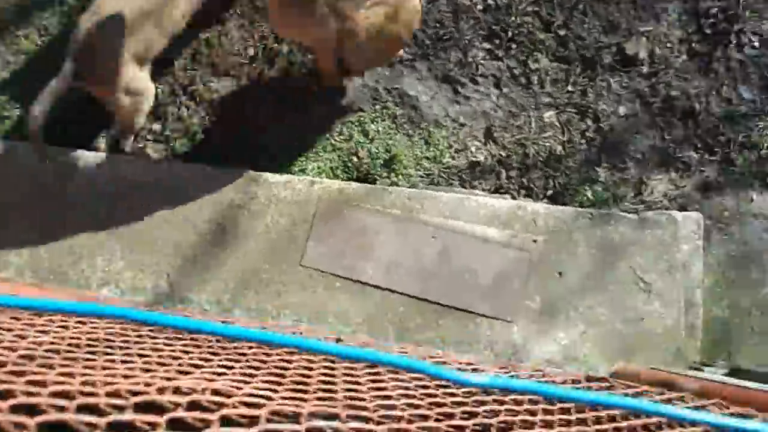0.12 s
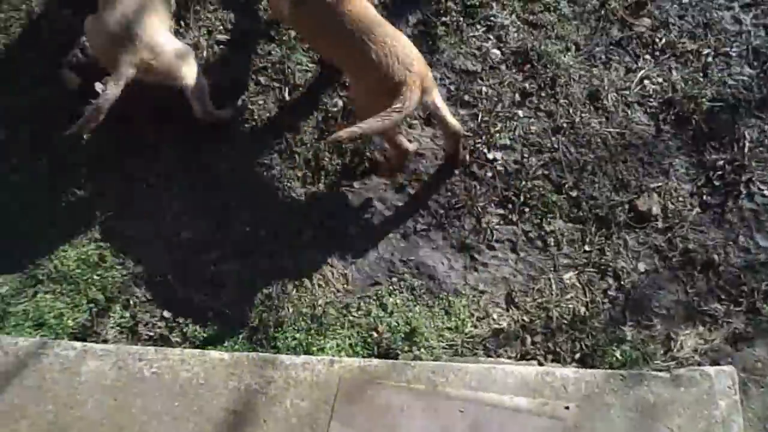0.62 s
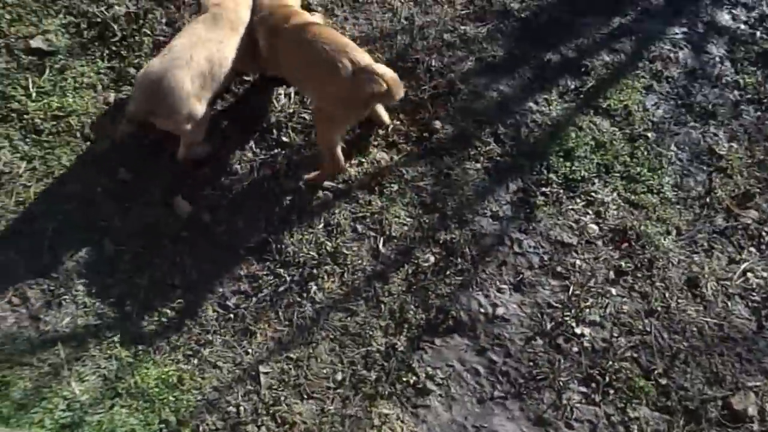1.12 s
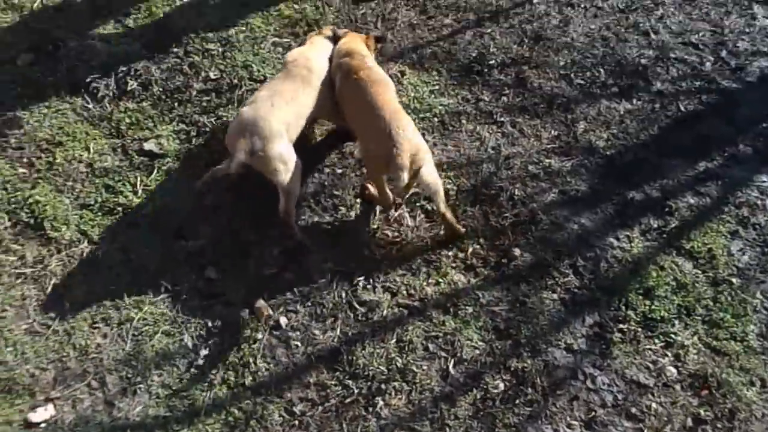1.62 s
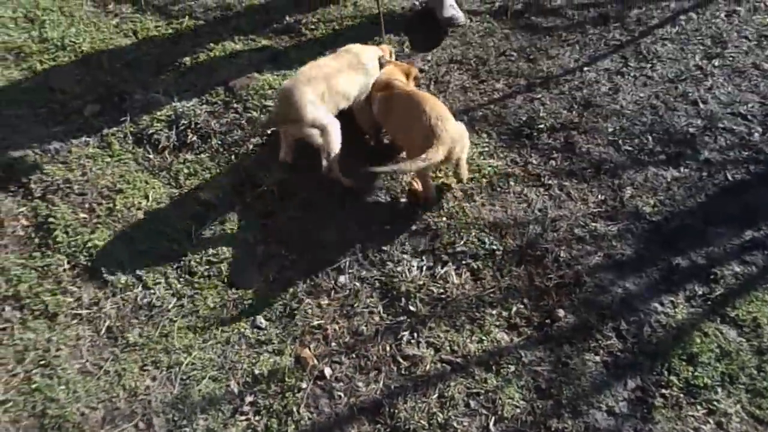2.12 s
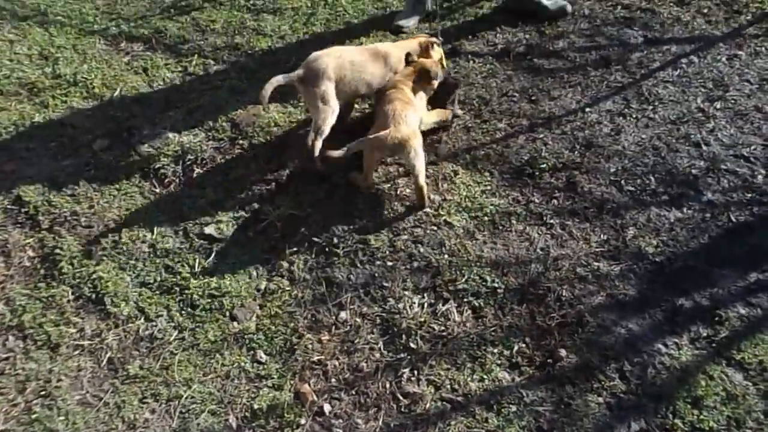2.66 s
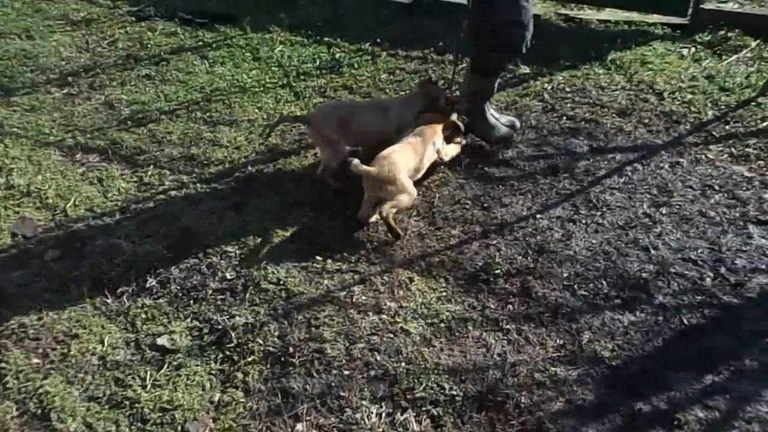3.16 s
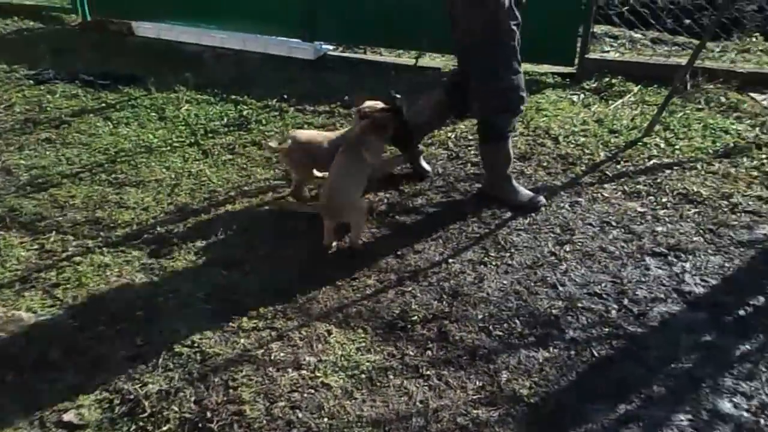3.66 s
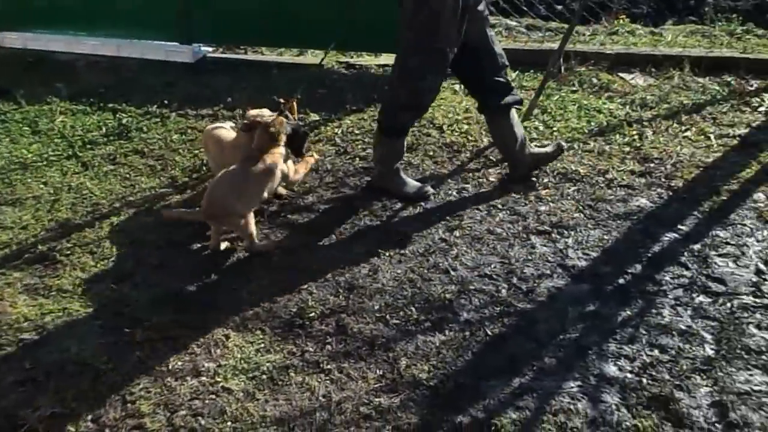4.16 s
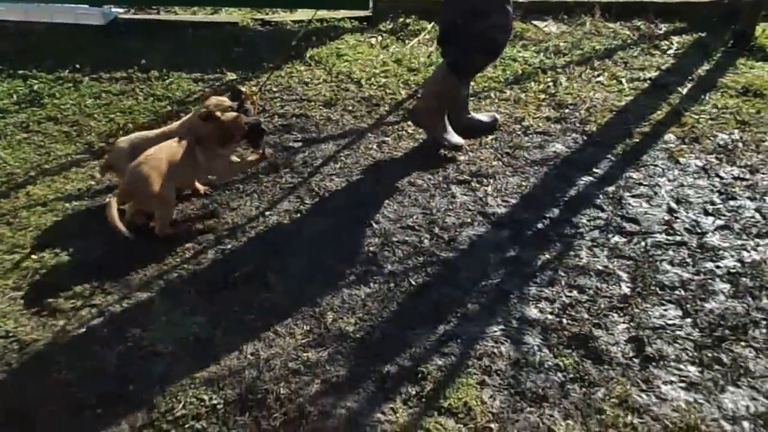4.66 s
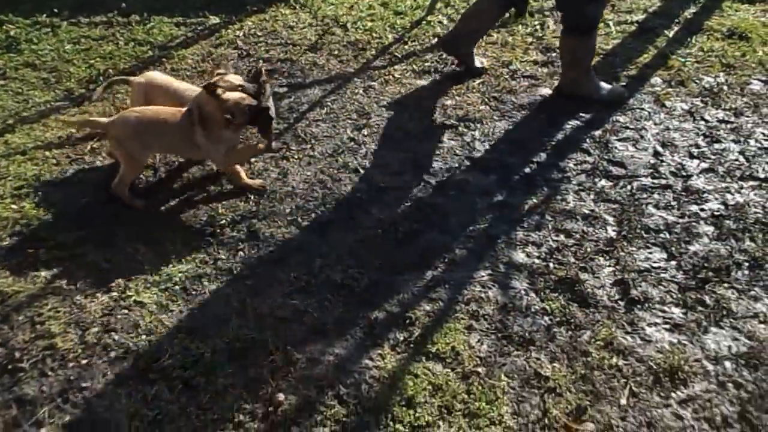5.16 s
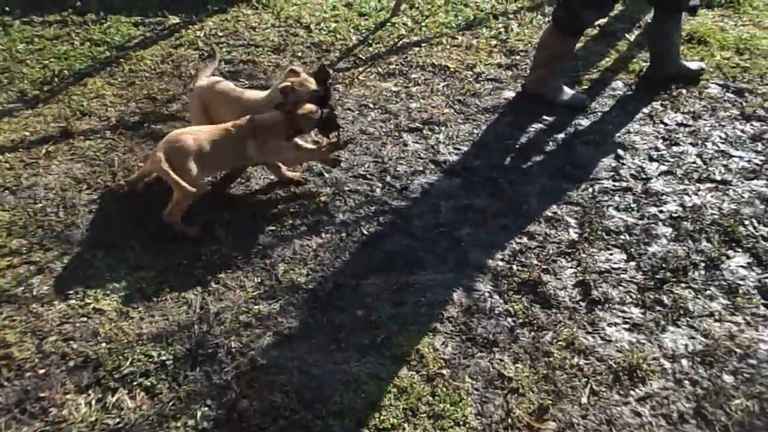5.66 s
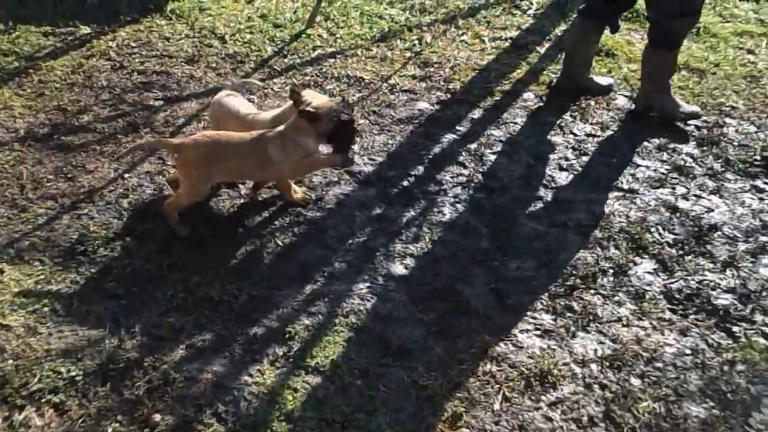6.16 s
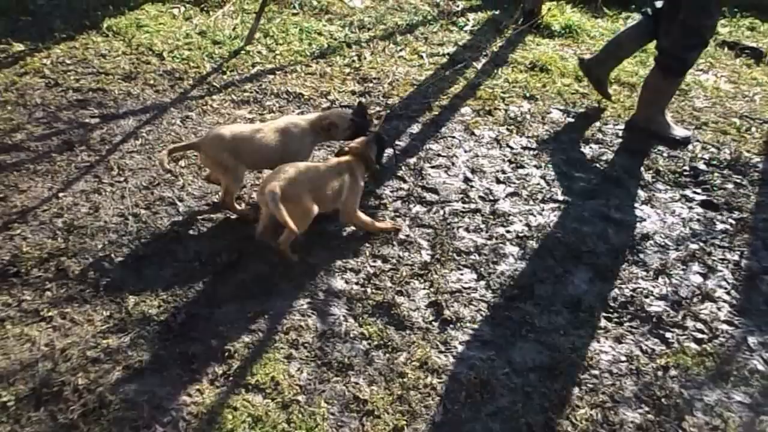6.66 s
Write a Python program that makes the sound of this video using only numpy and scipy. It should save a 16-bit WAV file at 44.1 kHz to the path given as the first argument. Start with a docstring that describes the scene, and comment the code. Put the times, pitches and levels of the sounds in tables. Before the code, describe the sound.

Close, dry scuffling on gritty mud: irregular soft thuds, crackling scrapes and short twig snaps, two of them sharp early on. Then one puppy yelps brightly, another whines thinly through the nose, and further yelps shrink into muffled cries. The voices echo briefly off yard walls, while faint air and microphone hiss runs underneath. A band-limited handheld microphone slightly overloads on the loudest peaks.

```python
"""Over a soft, wavering outdoor hiss, two puppies tug at a rag in a walled yard: from the start paws thud (low
pulses) and scuff on gritty mud (filtered random grains), and twigs and grit snap (short cracks). From 3.6 s
rising yelps ring off the yard walls, the first with a dull click at its peak; a second puppy whines thinly at
3.9 s and 5.2 s. Snaps and scuffs go on, with a last faint, low yelp at 6.5 s. Voices are harmonic stacks
through a vocal tract; the yard is one wall echo and a decaying noise tail."""
import sys
import numpy as np
from scipy import signal
from scipy.fft import rfft, irfft, next_fast_len
from scipy.io import wavfile

SR = 44100
rng = np.random.default_rng(int(sys.argv[2]) if len(sys.argv) > 2 else 0)


def natural_amplitude(level_db):
    """Convert a level in decibels to a linear amplitude factor, elementwise."""
    exponent = np.asarray(level_db, float) / 20
    return 10 ** exponent


def master(y):
    """Save y as 16-bit WAV."""
    cut = np.clip(np.atleast_2d(y).T, -1, 1)
    pcm = np.round(cut * 32767)  # scale
    wavfile.write(sys.argv[1], SR, pcm.astype(np.int16))


N = 299483  # samples


def rms_one(x):
    """Scale to rms 1."""
    return x / np.sqrt(np.mean(x ** 2) + 1e-20)


def at_hz(points, hz):
    """Read a spectrum in dB on a log-frequency axis."""
    points_hz, points_db = np.transpose(points)
    return np.interp(np.log(hz), np.log(points_hz), points_db)


def filtered(x, order, cut_hz, kind="low"):
    """Butterworth filter."""
    return signal.sosfilt(signal.butter(order, cut_hz, kind, fs=SR, output="sos"), x)


def colour(x, points):
    """Weight noise by a spectrum; rms 1."""
    size = next_fast_len(N)
    hz = np.maximum(np.arange(size // 2 + 1) * SR / size, 1)
    shaped = irfft(rfft(x, size) * natural_amplitude(at_hz(points, hz)), size)
    return rms_one(shaped[:N])


def drift(rate_hz, count=N):
    """Slow random wander with spread 1: straight lines between random knots, two per 1/rate_hz."""
    knots = rng.standard_normal(N // 64)
    place = np.arange(count) * rate_hz * 2 / SR
    return np.interp(place, np.arange(len(knots)), knots) * np.sqrt(3 / 2)


def knock(hz, cycles):
    """Soft-edged pulse: a sine under an envelope that peaks at 1 after the given cycles and dies away."""
    turns = np.arange(int(0.12 * SR)) / SR * hz
    envelope = (turns / cycles) ** 2 * np.exp(2 - 2 * turns / cycles)
    return np.sin(2 * np.pi * turns) * envelope


def add(out, start_s, sound):
    """Mix a sound in at a time."""
    i = int(start_s * SR)
    out[i:i + len(sound)] += sound[:N - i]


def strokes(rows, attack_s, t60_s):
    """Summed stroke envelopes: each swells, holds until its length is up and dies away."""
    out, t = np.zeros(N), np.arange(SR) / SR
    for start_s, length_s, level_db in rows:
        decay_db = -60 * np.maximum(t - length_s, 0) / t60_s
        add(out, max(start_s, 0), np.minimum(t / attack_s, 1) * natural_amplitude(level_db + decay_db))
    return out


def air():
    """Far traffic, leaves and the microphone's own hiss: coloured noise, wavering a little."""
    # hiss spectrum: (frequency [Hz], relative density [dB])
    air_spectrum = [(15, -40), (25, -4), (65, 0.5), (503, 3), (572, 3.5), (650, 1), (2170, -3), (3270, -4),
                    (6370, -4), (7630, -13.5), (8450, -10), (10100, -5.5), (11500, -17), (15000, -52),
                    (22000, -120)]
    level_db = -52
    waver_db = 0.9 * drift(3.0) + 1.1 * drift(15.0)
    return natural_amplitude(level_db + waver_db) * colour(rng.standard_normal(N), air_spectrum)


def scuffing():
    """Grit crackles in clumps under dragging paws, coarse and fine apart; scraped soil sounds duller."""
    # grit spectrum: (frequency [Hz], relative density [dB])
    grit_spectrum = [(1290, -15), (2200, -8.5), (3720, -4), (4580, 0.5), (6000, 2), (7750, 1),
                     (10000, -6.5), (10700, -11), (11500, -20.5), (15000, -59), (22000, -120)]
    # paws dragging through grit: (time [s], length [s], level [dB])
    scuff_rows = [(0.0, 0.032, -35.5), (.1, 0.23, -51.5), (.245, 0.051, -28), (.40, 0.09, -47.5),
                  (.62, 0.031, -59), (.84, 0.036, -47.5), (.925, 0.034, -43.5), (1.02, 0.062, -46.5),
                  (1.21, 0.056, -47), (1.49, 0.038, -49), (1.67, 0.014, -47), (1.83, 0.092, -47.5),
                  (2.045, 0.11, -47), (2.33, 0.028, -69), (2.49, 0.043, -48), (2.66, 0.018, -53),
                  (2.84, 0.11, -51), (3.06, 0.013, -49), (3.17, 0.017, -56), (3.25, 0.01, -62),
                  (3.345, 0.012, -65), (3.58, 0.041, -44), (4.28, 0.068, -46.5), (4.39, 0.059, -49),
                  (4.45, 0.051, -38), (4.57, 0.16, -48.5), (4.87, 0.08, -41), (5.04, 0.033, -42),
                  (5.16, 0.12, -47), (5.6, 0.086, -41.5), (5.69, 0.084, -40), (5.825, 0.034, -38),
                  (5.87, 0.049, -47), (6.27, 0.13, -52), (6.51, 0.058, -47.5), (6.74, 0.066, -46.5)]
    # steady crackle between the scuffs: (time [s], level [dB])
    shuffle_points = [(0, -45.5), (.6, -48), (1.3, -53.5), (1.9, -47.5), (2.2, -52.5), (3.5, -54),
                      (3.75, -40.5), (3.9, -55.5), (4.2, -49), (4.8, -69.5), (5.0, -46.5), (5.5, -55),
                      (6.79, -52)]
    # soil scraped aside: (time [s], length [s], level [dB])
    scrape_rows = [(0.0, 0.074, -57), (.26, 0.044, -68), (.45, 0.18, -53.5), (.72, .05, -59),
                   (.86, 0.086, -62), (1.24, 0.044, -59), (1.55, 0.13, -63), (1.87, 0.21, -58.5),
                   (2.29, 0.031, -65), (2.47, .08, -55.5), (2.74, 0.22, -59), (3.13, 0.048, -60),
                   (5.63, 0.26, -53), (6.0, 0.74, -62.5)]
    split_hz = 7300.0

    # rows: coarse, fine, soil
    sizes = natural_amplitude(3.8 * np.minimum(rng.exponential(1, (3, N)), 5)) * rng.choice([-1, 1], (3, N))
    clumps = natural_amplitude(3.3 * np.array([drift(40.0), drift(40.0), drift(14.0)]))
    grains_per_s = np.array([[4000.0], [4000.0], [3000.0]]) * clumps
    grains = sizes * (rng.random((3, N)) < grains_per_s / SR)
    coarse = natural_amplitude(3.56 * drift(25.0)) * filtered(grains[0], 4, split_hz)
    fine = natural_amplitude(4.0 * drift(25.0)) * filtered(grains[1], 4, split_hz, "high")
    soil = rms_one(filtered(grains[2], 2, [800.0, 1250.0], "band"))

    shuffle = natural_amplitude(np.interp(np.arange(N) / SR, *np.transpose(shuffle_points)))
    drag = strokes(scuff_rows, attack_s=0.011, t60_s=0.1) + shuffle
    scrape = strokes(scrape_rows, attack_s=0.015, t60_s=0.28)
    return drag * colour(coarse + fine, grit_spectrum) + scrape * soil


def snaps():
    """Twigs and grit snap: a short crack, a splintering noise tail around its pitch and a lower tick."""
    # (time [s], crack level [dB], pitch [Hz], tick level re crack [dB])
    snap_rows = [(0.2885, -20, 5200, -20), (0.3097, -0.5, 5910, -28), (0.4225, -27, 4400, -4.5),
                 (0.5272, -29, 6600, -6.5), (0.766, -29, 2420, -1.5), (0.8272, -26.5, 6230, -24),
                 (0.9783, -29, 7400, -23), (1.275, -23, 5600, -14), (1.84, -32, 5740, -26),
                 (1.9206, -19, 5850, -15), (2.1245, -6.5, 5350, -44), (3.484, -19.5, 5460, -39),
                 (3.6192, -27, 3900, -12), (4.279, -31, 6160, -13), (4.3084, -23, 6500, -19),
                 (4.4626, -14, 5700, -27), (4.654, -29, 6390, -14), (4.695, -42, 2520, 10),
                 (4.8746, -26.5, 7050, -15), (5.181, -38, 3950, 3), (5.2515, -22.5, 7900, -35),
                 (5.3418, -19.5, 5270, -9.5), (5.565, -37, 3980, 0.5), (5.604, -23, 6870, -10),
                 (5.6253, -17.5, 7600, -16), (5.657, -23.5, 6100, -16), (5.746, -15.5, 7340, -43),
                 (5.8723, -35, 4670, -26), (6.0033, -27.5, 3760, -24), (6.0517, -6.5, 6150, -55),
                 (6.1127, -29, 4400, -9), (6.1936, -17.5, 6600, -40), (6.5769, -26, 6300, -31),
                 (6.7492, -27.5, 6230, -10.5)]
    attack_s, t60_s = 0.00042, 0.007
    out, t = np.zeros(N), np.arange(int(0.12 * SR)) / SR
    envelope = natural_amplitude(-60 * t / t60_s) * np.minimum(t / attack_s, 1)
    for start_s, level_db, hz, tick_db in snap_rows:
        band_hz = [hz * 0.78, min(hz * 1.06, 12000)]
        noise = rms_one(filtered(rng.standard_normal(len(t)), 1, band_hz, "band"))
        tail = 0.66 * noise * envelope
        tick = natural_amplitude(tick_db) * knock(1540.0, 0.92)
        add(out, start_s + 0.0003, natural_amplitude(level_db) * (knock(hz, 1.73) + tail + tick))
    return out


def thuds():
    """A paw lands as a soft low push with a slap of varying pitch, and loose soil settles after it."""
    # paws landing: (time [s], push level [dB], pitch [Hz])
    thud_rows = [(0.068, -38, 230), (0.18, -39, 160), (0.26, -31.5, 278), (0.419, -37.5, 198),
                 (0.47, -38, 182), (0.539, -43.5, 236), (0.565, -38.5, 955), (0.622, -37, 260),
                 (0.712, -38, 305), (0.785, -36.5, 387), (0.916, -40, 397), (0.946, -42, 250),
                 (0.97, -44, 482), (1.009, -34.5, 230), (1.071, -34, 214), (1.218, -41, 446),
                 (1.269, -39.5, 405), (1.285, -37, 600), (1.419, -38.5, 527), (1.464, -36.5, 254),
                 (1.508, -40, 277), (1.606, -36.5, 226), (1.728, -35.5, 256), (1.926, -39, 178),
                 (1.984, -34.5, 257), (2.045, -39, 240), (2.799, -38, 640), (2.861, -36.5, 560)]
    # lighter steps at random while the tussle is near
    patter_end_s, patter_db, patter_spread_db = 2.2, -43, 3
    patter_low_hz, patter_high_hz = 180, 520
    when, weight, size = rng.random((12, 3)).T
    patter_level_db = patter_db + patter_spread_db * (2 * weight - 1)
    patter_hz = patter_low_hz * (patter_high_hz / patter_low_hz) ** size
    steps = list(thud_rows) + list(zip(when * patter_end_s, patter_level_db, patter_hz))

    out, t = np.zeros(N), np.arange(int(0.12 * SR)) / SR
    noise = rng.standard_normal((len(steps), len(t)))
    settling = rms_one(filtered(noise, 2, [200.0, 750.0], "band")) * natural_amplitude(-60 * t / 0.15)
    for (start_s, level_db, hz), soil, hardness in zip(steps, settling, rng.random(len(steps))):
        # harder slaps are louder and higher
        slap = 0.69 * hardness * knock((1.57 + 2.24 * hardness) * hz, 1.2)
        add(out, start_s + 0.00172, natural_amplitude(level_db) * (knock(hz, 0.91) + slap + 0.34 * soil))
    return out


def peak_click():
    """One dull click at the height of the first yelp: a single very short pulse."""
    out = np.zeros(N)
    add(out, 3.7100, natural_amplitude(-16) * knock(2200.0, 0.25))
    return out


def voice(calls, slopes_db, tract, pure_width_hz, edge_s):
    """Vocal folds drive a harmonic stack through the tract; roughness shakes it and blurs it into rasp."""
    # slopes in dB per octave: near the throat resonance the voice turns pure, rasp brightens it again
    pure_hz, pure_db, rasp_db, steepest_rise_db = 791.3, -18, 23, 8
    out, k = np.zeros(N), np.arange(1, 16)[:, None]
    for rows, slope_db in zip(calls, slopes_db):
        s, *columns = np.transpose(rows)
        t = np.arange(s[0], s[-1], 1 / SR)
        hz, level_db, rough = [np.interp(t, s, column) for column in columns]
        rough = np.clip(rough, 0, 1)

        purity = np.exp(-((hz - pure_hz) / pure_width_hz) ** 2)
        slope = np.minimum(slope_db + pure_db * purity + rasp_db * rough, steepest_rise_db)
        tract_db = at_hz(tract, k * hz) - at_hz(tract, hz)
        heights = (k * hz < SR / 3) * natural_amplitude(slope * np.log2(k) + tract_db)

        shaken_hz = hz * (1 + 0.12 * rough * drift(250.0, count=len(t)))
        phase = 2 * np.pi * np.cumsum(shaken_hz) / SR
        # each overtone wanders in phase on its own [rad]
        wander = np.array([drift(300.0, count=len(t)) for _ in k])
        blur = 1.3 * rough * (k - 1) * wander
        stack = np.sum(heights * np.sin(k * phase + blur), axis=0)
        stack *= 1 + 1.8 * rough * drift(90.0, count=len(t))
        fade = np.clip(np.minimum(t - s[0], s[-1] - t) / edge_s, 0, 1)
        add(out, s[0], np.sqrt(2) * natural_amplitude(level_db) * fade * stack)
    return out


def whining():
    """The second puppy whines through the nose, which favours the fundamental over the overtones."""
    # one list per whine: (time [s], pitch [Hz], fundamental level [dB], roughness [0-1])
    whine_calls = [
        [(3.875, 1020, -37, 0.028), (3.93, 1006, -32.5, .01), (3.97, 1005, -26.5, 0.0044),
         (4.03, 1027, -32, 0.0053), (4.11, 1019, -37, 0.0057), (4.17, 990, -35.5, 0.022),
         (4.2, 933, -35.5, .027), (4.23, 758, -41.5, 0.054), (4.27, 695, -48, 0.093)],
        [(5.15, 2010, -51, 0.023), (5.19, 1990, -47, .016), (5.29, 2000, -68, 0.018)],
    ]
    # overtone slope of each whine [dB per octave]
    whine_slopes_db = [2.04, -15]
    # nasal tract: (frequency [Hz], gain [dB])
    nose = [(700, 29), (1000, 4.5), (2000, -2), (3000, -12.5), (4000, -15), (5000, -20), (7000, -18.5),
            (9000, -18), (11000, -53)]
    return voice(whine_calls, whine_slopes_db, nose, pure_width_hz=170, edge_s=0.027)


def yelping():
    """Two yelps from an open mouth, then three muffled by the rag between the jaws."""
    # one list per yelp: (time [s], pitch [Hz], fundamental level [dB], roughness [0-1])
    yelp_calls = [
        [(3.644, 493, -42, 0), (3.661, 530.4, -34, 0.04), (3.681, 617, -26, 0.1), (3.701, 682.6, -21.5, 0.17),
         (3.709, 714, -13, 0.28), (3.722, 767.4, -11, 0.33), (3.738, 778.3, -20.5, 0.5),
         (3.785, 777, -34, 0.67)],
        [(4.345, 441, -54, 0.01), (4.375, 597, -37.5, 0), (4.398, 679, -37.5, 0.31), (4.41, 746.5, -17, 0.02),
         (4.435, 798.3, -23.5, 0.02), (4.55, 783, -34.5, 0.12), (4.61, 780, -56, 0.1)],
        [(4.70, 430, -55, 0.11), (4.72, 468, -43.5, 0.06), (4.76, 587, -45.5, 0.18), (4.85, 749.5, -35.5, 0.05),
         (4.88, 741, -28, 0.02), (4.92, 737.5, -35.5, 0.07), (4.97, 718, -51, 0.03)],
        [(5.10, 445, -49, 0.02), (5.15, 611, -40.5, 0.2), (5.20, 683, -45, 0.11), (5.27, 784, -44.5, 0.17),
         (5.38, 599.4, -52.5, 0.14), (5.46, 580.5, -63, 0.07), (5.59, 579.5, -67, 0)],
        [(6.5, 408.5, -57, .02), (6.56, 459.4, -55, 0.02), (6.63, 479, -60, .02), (6.70, 435, -68, .03)],
    ]
    # overtone slope of each yelp [dB per octave]
    yelp_slopes_db = [4.5, -0.5, -5.5, -8, -11]
    # open mouth: (frequency [Hz], gain [dB])
    throat = [(900, 4.5), (1500, 0), (2100, -3.5), (2700, -18.5), (3400, -26.5), (4300, -38), (5600, -32),
              (8500, -41), (11000, -49.5)]
    # rag between the jaws: (frequency [Hz], gain [dB])
    gagged = [(800, 3.5), (1200, 1.5), (1500, -13), (2050, -0.5), (2600, -16), (11000, -57)]
    width_hz = 82.5
    open_yelps = voice(yelp_calls[:2], yelp_slopes_db[:2], throat, width_hz, edge_s=0.0059)
    gagged_yelps = voice(yelp_calls[2:], yelp_slopes_db[2:], gagged, width_hz, edge_s=0.0086)
    return open_yelps + gagged_yelps


def yard(x):
    """A house wall throws a distinct echo; fences and sheds scatter a dense, dull tail after a gap."""
    t60_s, gap_s, cut_hz = 0.57, 0.0046, 3550
    tail_db, wall_s, wall_db = -0.5, 0.052, -6  # levels ahead of the low-pass
    t = np.arange(SR) / SR
    tail = rng.standard_normal(SR) * natural_amplitude(-60 * t / t60_s) * np.clip(t / gap_s - 1, 0, 1)
    tail *= natural_amplitude(tail_db) / np.sqrt(np.sum(tail ** 2))
    add(tail, wall_s, natural_amplitude(wall_db) * np.ones(1))
    return signal.fftconvolve(x, filtered(tail, 1, cut_hz))[:N]


def scene():
    """Voices carry to the walls; small sounds stay nearly dry."""
    small_sounds = snaps() + thuds() + peak_click()
    whines = whining()
    yelps = yelping()
    # whines are aimed at the microphone, so less of them reaches the walls
    to_walls = yelps + natural_amplitude(-4.0) * whines + natural_amplitude(-19.5) * small_sounds
    mix = air() + scuffing() + small_sounds + whines + yelps + yard(to_walls)
    return mix[None]


def band_limit(x):
    """A steep low-pass at the top of the band."""
    return signal.sosfilt(signal.butter(12, 16840, fs=SR, output="sos"), x)


def record(dry):
    """The microphone port cuts a narrow notch, the top is cut steeply, the loudest peaks overload."""
    notch_hz, notch_width_hz, cutoff_hz, overload = 7680, 490, 11865, 0.78
    x = signal.lfilter(*signal.iirnotch(notch_hz, notch_hz / notch_width_hz, fs=SR), dry)
    # stopband edge at cutoff_hz, 38 dB down
    x = signal.sosfilt(signal.cheby2(10, 38, cutoff_hz, fs=SR, output="sos"), x)
    return band_limit(np.clip(x, -overload, overload))


dry = scene()
out = record(dry)
master(out)
```